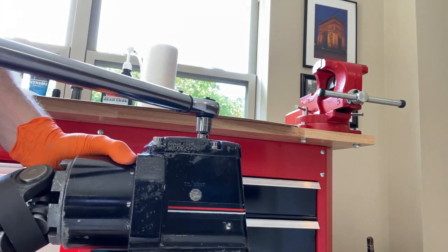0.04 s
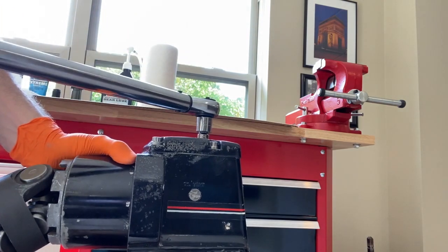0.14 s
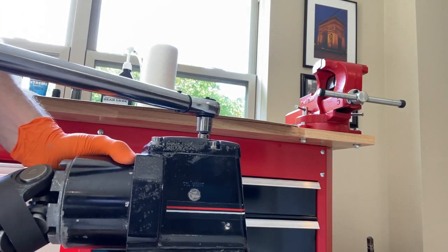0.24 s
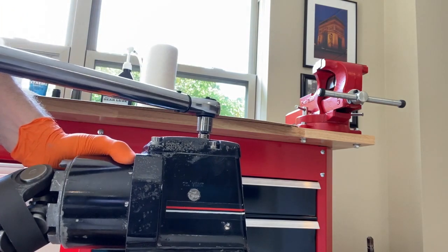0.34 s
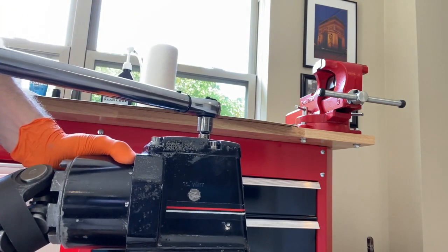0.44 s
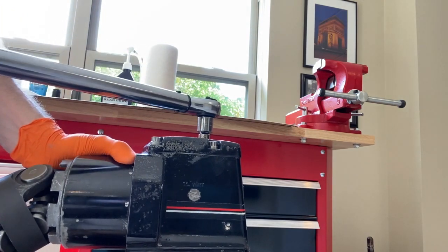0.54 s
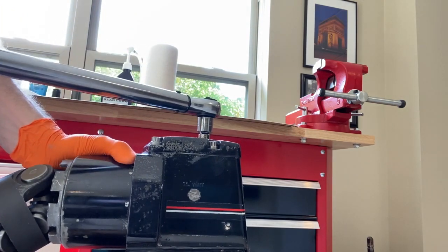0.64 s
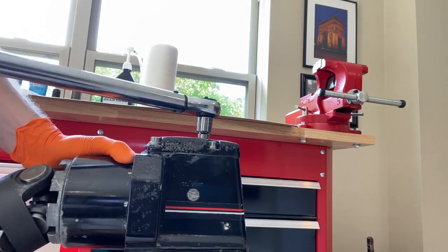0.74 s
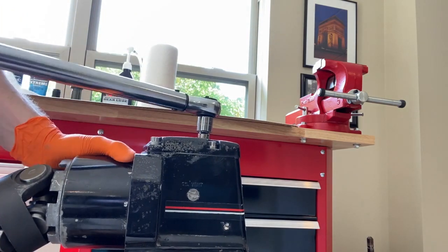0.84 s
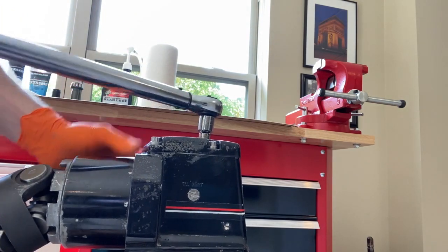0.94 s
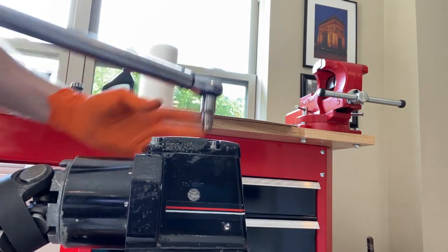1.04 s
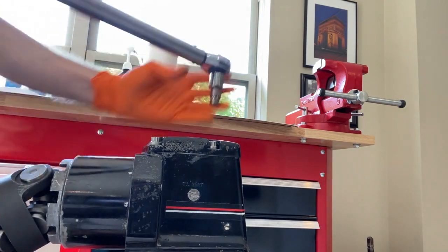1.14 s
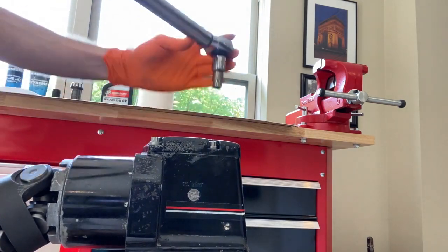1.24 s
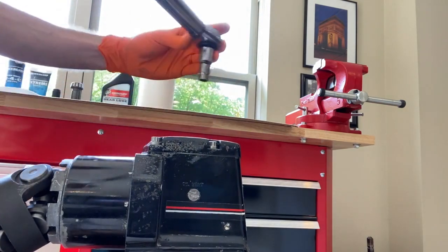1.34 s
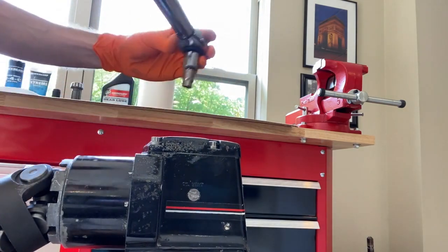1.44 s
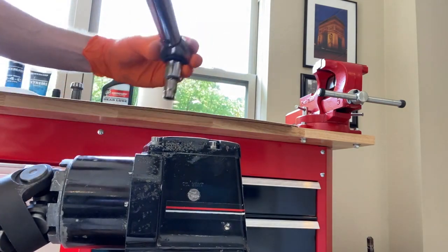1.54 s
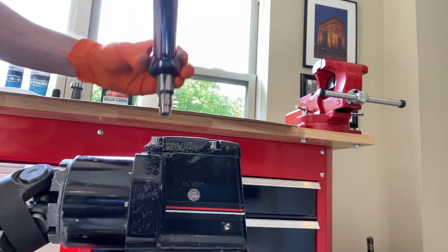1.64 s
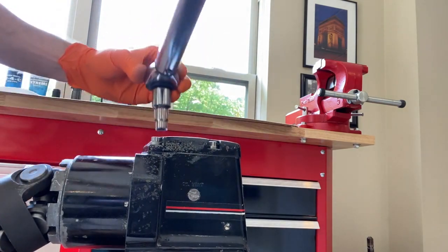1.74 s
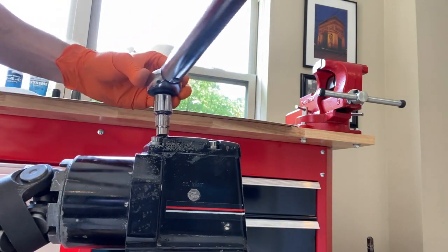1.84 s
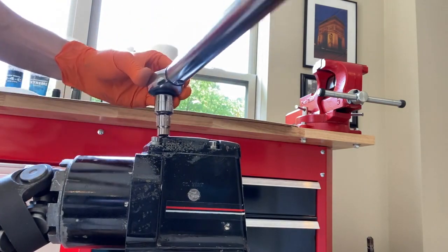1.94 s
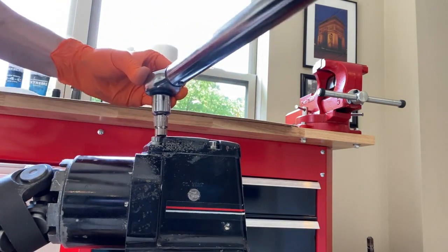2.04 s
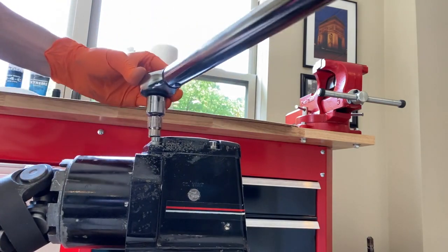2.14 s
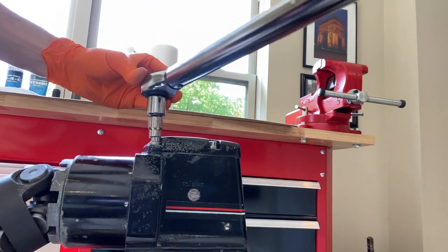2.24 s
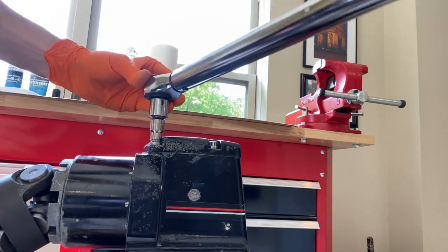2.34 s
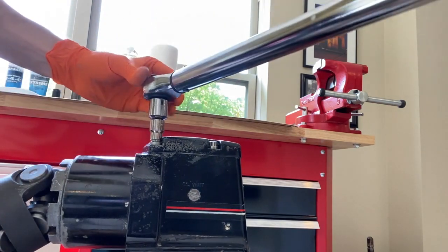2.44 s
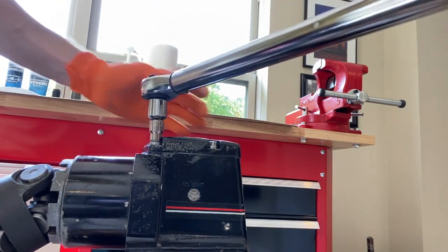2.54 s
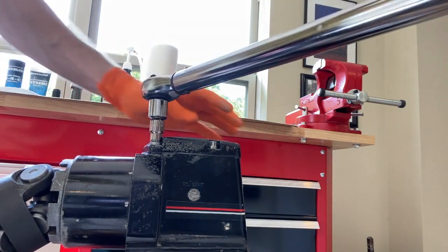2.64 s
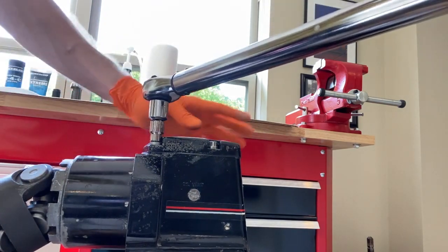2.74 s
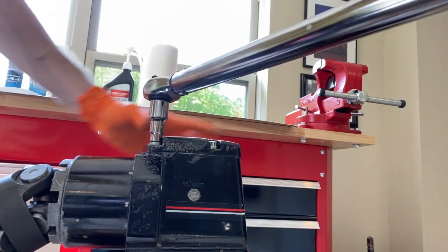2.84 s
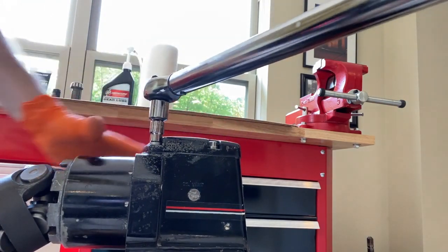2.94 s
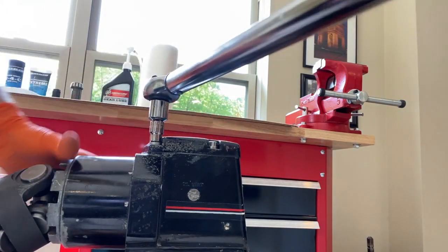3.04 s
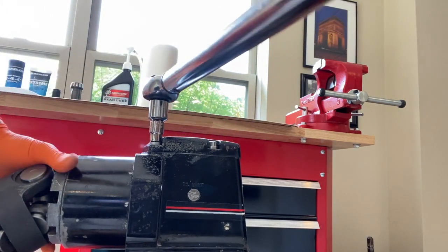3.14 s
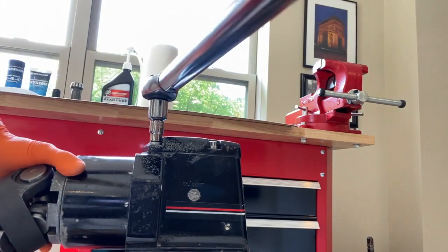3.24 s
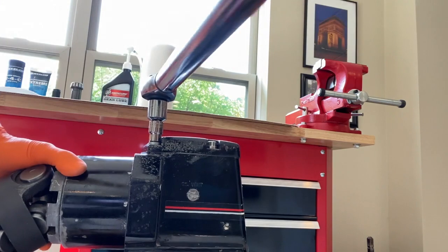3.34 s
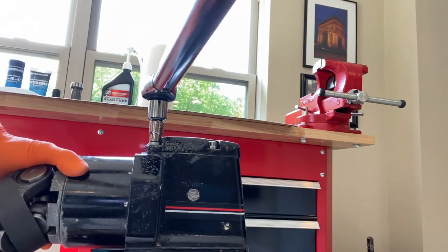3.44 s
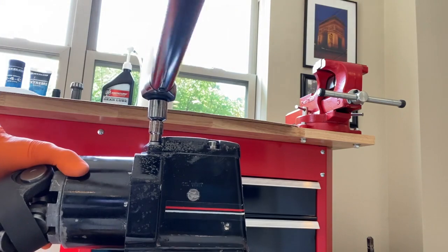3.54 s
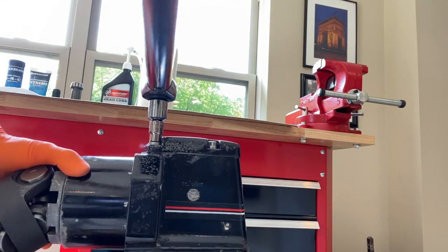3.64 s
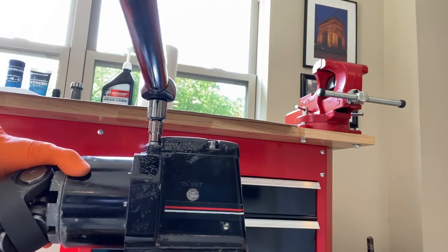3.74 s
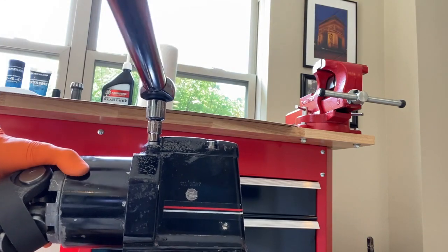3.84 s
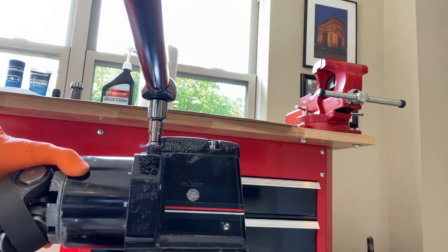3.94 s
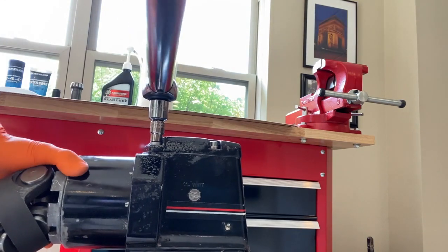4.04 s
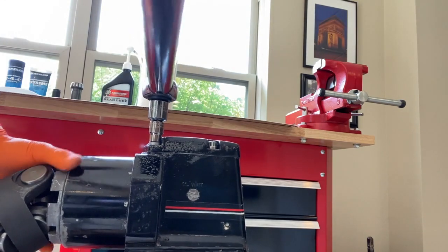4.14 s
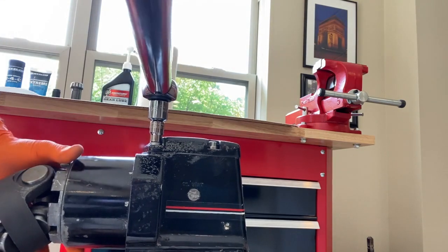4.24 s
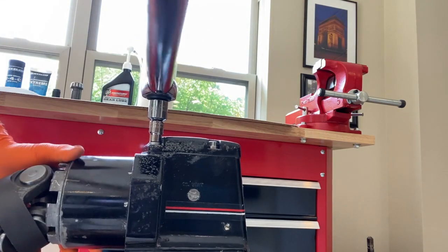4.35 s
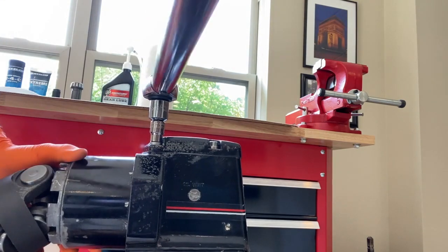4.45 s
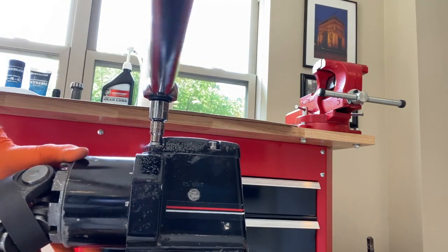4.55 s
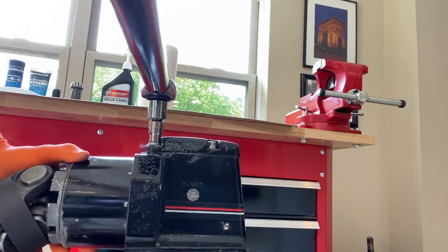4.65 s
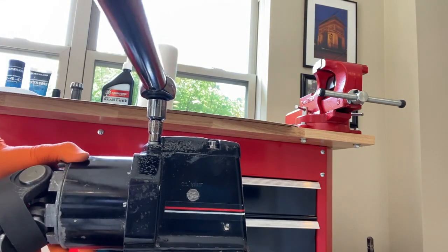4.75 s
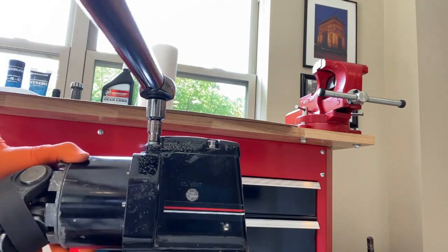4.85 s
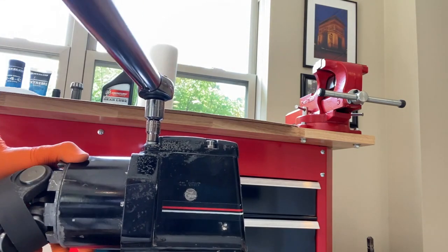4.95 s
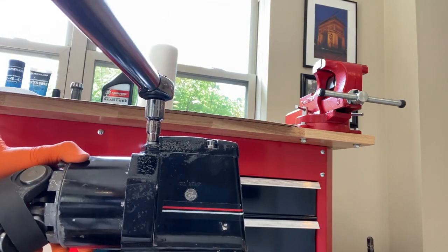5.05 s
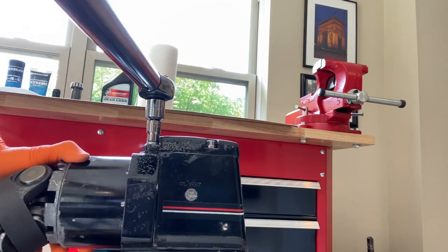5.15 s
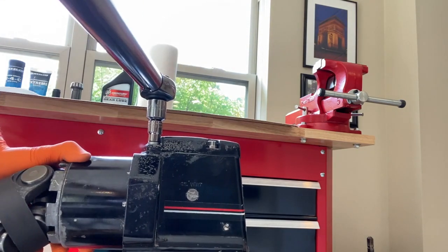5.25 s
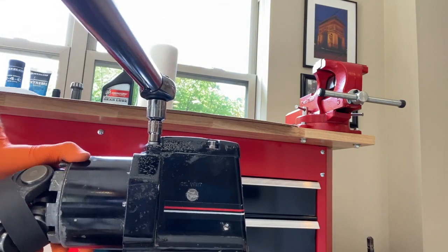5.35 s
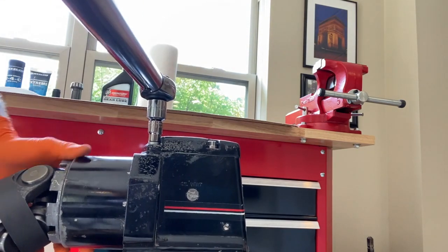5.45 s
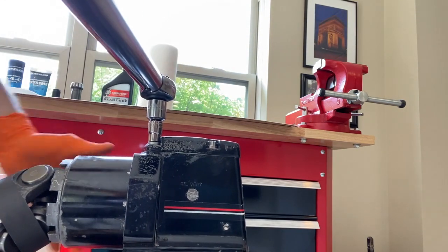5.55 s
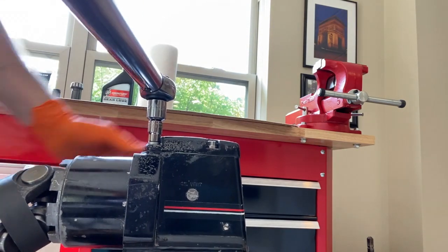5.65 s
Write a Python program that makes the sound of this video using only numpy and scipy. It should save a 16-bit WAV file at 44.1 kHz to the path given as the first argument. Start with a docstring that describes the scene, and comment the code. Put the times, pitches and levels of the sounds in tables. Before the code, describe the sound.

Irregular metallic clicks, socket knocks and ratchet ticks from a torque wrench on a heavy casting, with rubber glove scuffs in a quiet garage.

```python
"""A low hum and soft air fill a quiet garage; then a steel torque wrench is worked on a cast housing, close by.
The hum is noise plus one sine that swell together; faint high chirps outside the window are short sines.
A rubber glove slides on the casting: shaped hiss and scuff. The wrench clicks over, its socket knocks on
bolt heads and the ratchet ticks: each contact is a tick and rattle of noise over ringing steel modes.
Wrench and glove get a left-right lead and balance that follow the work; the garage adds reflections."""
import sys
import numpy as np
from scipy import signal
from scipy.fft import rfft, irfft
from scipy.io import wavfile
from scipy.ndimage import uniform_filter1d

SR = 44100
rng = np.random.default_rng(int(sys.argv[2]) if len(sys.argv) > 2 else 0)


def wav_out(sig):
    """Save sig, one row per channel (or a flat mono array), as 16-bit PCM at SR to the path in sys.argv[1]."""
    wavfile.write(sys.argv[1], SR, np.round(np.clip(np.atleast_2d(sig).T, -1, 1) * 32767).astype(np.int16))


N = 251308  # samples

# Room air colour: (frequency [Hz], relative density [dB per Hz])
AIR_SPECTRUM = [(50, -55), (90, 1.5), (146, -14), (175, -9.5), (350, -15), (600, -20.5), (1600, -27.5),
                (5200, -36), (8200, -35), (13000, -40.5), (13700, -64)]
AIR_DB = -61
# Hum noise colour: (frequency [Hz], relative density [dB per Hz])
HUM_SPECTRUM = [(22, -36), (40, -18), (52, 5.5), (59, 51.5), (66, 15.5), (85, -5), (120, -36), (170, -24)]
# Swelling of the hum, before its trim: (time [s], level [dB])
HUM_SWELL = [(0.0, -58), (0.7, -54), (1.19, -59.5), (1.59, -49), (1.97, -54.5), (2.6, -54), (2.9, -50.5),
             (3.4, -54), (4.63, -49), (4.92, -54.5), (5.52, -48.5), (5.7, -56)]
HUM_TRIM_DB, HUM_TONE_HZ, HUM_TONE_DB = -7.0, 59.4, -5.5  # the tone level rides on the swell
# Likeness of the channels in room air and reflections: (frequency [Hz], left-right likeness [-1 to 1, clipped])
ROOM_LIKENESS = [(60, 0.75), (150, 0.44), (370, 0.42), (920, -0.32), (2290, 0.015), (5700, 0.072),
                 (8400, 1), (10500, 0.72), (14200, -1.1)]

# Whistles outside: (time [s], level [dB], frequency [Hz], length [s])
CHIRPS = [(0.404, -69, 8230, 0.021), (0.424, -68.5, 8200, 0.0084), (0.77, -65, 8200, 0.018),
          (0.787, -60.5, 8230, 0.044), (2.777, -59.5, 8320, 0.046)]

# Decay of the reflections: (frequency [Hz], t60 [s])
GARAGE_T60 = [(200, 0.34), (1000, 0.15), (3000, 0.28), (8000, 0.21), (14000, 0.14)]
GARAGE_DB = -11
# Where the work is heard: (time [s], lead of the left channel [microseconds], left-right balance [dB])
PLACE = [(.5, 116, 3), (.9, 7.6, 0.4), (2.8, 7.3, -0.9), (3.1, 5.2, 1), (3.9, 2.2, 0.5), (4.1, 109, 0.5),
         (4.35, 18, -2), (4.8, 6.6, 1), (5.2, 106, 1.5), (5.6, 107, 2.5)]
# Frequency-dependent phase lead of the left channel: (frequency [Hz], lead [radians])
PHASE_LEAD = [(5000, 0.45), (9500, 0.023), (11500, 0.8), (14300, 1.5)]
DELAY_S = .0021866  # fixed delay on all wrench and glove sounds

# Fine hiss of rubber on metal: (frequency [Hz], relative density [dB per Hz])
HISS_SPECTRUM = [(900, -20), (1500, -16.5), (2400, -9), (3100, -18), (4200, -13.5), (8300, -12.5),
                 (13300, -19.5), (14000, -55)]
# Duller scuff: (frequency [Hz], relative density [dB per Hz])
SCUFF_SPECTRUM = [(70, -2.5), (120, 5), (240, -14), (370, -3), (650, -8.5), (1200, -10), (2200, -19.5),
                  (4000, -21), (7000, -61)]
# Likeness of the channels in the sliding noise: (frequency [Hz], left-right likeness [-1 to 1])
SLIDE_LIKENESS = [(100, 0.25), (4000, 0.043), (8500, 0.99), (14000, 0.7)]
# Strokes of glove and socket, before the fixed delay:
# (time of full pressure [s], rise [s], hold [s], release [s], hiss level [dB], scuff level [dB])
STROKES = [(0.896, 0.13, 0.017, 0.14, -63, -63), (1.113, 0.095, 0.016, 0.093, -72, -97),
           (1.315, 0.42, .02, 0.18, -68, -79), (1.49, 0.21, 0.071, 0.18, -80, -65.5),
           (2.042, 0.1, 0.082, 0.13, -92, -68.5), (2.443, 0.1, 0.0076, 0.087, -54, -83),
           (2.533, 0.083, 0.049, 0.38, -70.5, -92), (2.988, 0.059, 0.04, .1, -65, -83.5),
           (3.089, 0.04, 0.0066, 0.021, -37.5, -50), (3.147, 0.04, 0.017, 0.17, -64.5, -62.5),
           (3.934, 0.059, 0.0038, 0.074, -62, -44.5), (4.079, 0.058, 0.023, 0.12, -51.5, -55),
           (4.159, 0.19, 0.16, 0.034, -61, -53.5), (4.393, 0.066, 0.18, 0.04, -106, -55.5),
           (4.566, 0.12, 0.009, 0.059, -61, -53.5), (4.743, 0.065, 0.0062, 0.058, -64.5, -41.5),
           (5.3, 0.13, 0.048, 0.088, -63.5, -47), (5.391, 0.15, 0.096, 0.035, -57.5, -56.5),
           (5.55, 0.14, 0.14, 0.11, -68.5, -57), (5.612, 0.092, 0.0058, 0.045, -74, -86)]
STROKE_SPAN_DB = 30  # covered by each rise and each release

# Modes of wrench, socket and casting bolted together, before detuning and each contact's ring factor:
# (frequency [Hz], relative level [dB], t60 [s])
STEEL_MODES = [(220.2, 1, 0.087), (264.7, -14, 0.13), (309, 2.5, 0.075), (346, 3, 0.084),
               (443.7, -16, 0.36), (578, 1.5, 0.068), (679, 11, 0.031), (785, -0.5, 0.076),
               (948.4, 0.5, 0.11), (980.6, -0.5, 0.15), (1052, -12.5, 0.25), (1428, -13.5, 0.41),
               (1498, 1.5, 0.072), (1541, -1, 0.095), (1950, -1.5, 0.15), (2123, -19.5, 0.19),
               (2290, -13.5, 0.19), (2550, -4, 0.038), (2945, -5, 0.099), (3254, -21, 0.13),
               (4140, -9, .06), (4620, 3, 0.06), (5580, -11, 0.047), (5600, -16, 0.029), (5870, 3, 0.045),
               (7350, 8, 0.013), (7570, 9, 0.024), (7900, 7.5, 0.056), (8100, -16, 0.034),
               (10680, -22, 0.021)]
# How well every contact couples into the parts: (frequency [Hz], gain [dB])
COUPLING = [(210, 1.5), (420, 4.5), (950, -2), (1700, 1.2), (4000, -0.5), (9000, -2), (14000, -1)]
# Blows of steel on steel, before the fixed delay: (time [s], level at the spot struck [dB],
# favoured frequency [Hz], fall below it [dB per octave], fall above it [dB per octave],
# contact time [ms], ring length [factor])
BLOWS = [(.4515, -31, 7260, 0.5, 22, .02, 0.096), (0.4516, -24, 945, 10.5, -1.5, 0.18, 0.65),
         (0.46, -37.5, 206.6, 6, 5.5, 0.41, 1.4), (0.893, -50, 300, -6, 4, 0.044, 0.33),
         (1.089, -68.5, 816, 4, -3.5, .03, 0.65), (1.127, -58, 2800, 17, 12, 0.05, 2.1),
         (1.255, -51.5, 2870, 13, 6, 0.088, 0.78), (1.343, -46, 1820, 5, 6, 0.12, 0.36),
         (1.441, -53.5, 1660, 0, 6, 0.26, 0.52), (.585, -57, 6260, 3, 15, .03, .4),
         (1.798, -35.5, 1490, 1, -6.5, 0.25, 0.79), (1.8082, -38, 2270, 1.5, 2, .03, 1.12),
         (1.936, -58.5, 2170, 10, 2, .03, 0.44), (2.141, -30.5, 1530, 4, -2, 0.033, 0.54),
         (2.248, -35.5, 1570, 2, -3, 0.026, 0.75), (2.2606, -32, 456, 22, 4.5, 0.06, 0.69),
         (2.327, -48.5, 1500, -1, 6.5, .03, 0.66), (2.434, -37.5, 2520, 8.5, 20.5, 0.09, 0.071),
         (2.468, -63, 2230, 7, -3, .03, 1.1), (2.545, -67.5, 462, 10, -3.5, 0.1, 0.64),
         (2.731, -42.5, 790, -6.5, 1, 0.027, 0.67), (2.847, -55, 2740, 16, 11, .2, 0.5),
         (2.964, -71.5, 358, -34, -2.5, 0.034, 0.93), (3.2138, -41.5, 434, -11, 8, 0.45, 0.058),
         (3.213, -52, 1540, 10, 19, 0.22, 0.27), (3.507, -58.5, 297, -16, -0.1, 0.28, 0.75),
         (3.926, -39.5, 3760, 1, 4, 0.051, 0.4), (4.287, -41.5, 510, -4, 0.5, 0.31, 0.37),
         (4.333, -43.5, 1520, -5, 8, 0.033, 0.59), (4.393, -49, 1010, 0, 3.5, 0.17, 1.4),
         (4.469, -46, 483, -14, 1, 0.21, 0.77), (4.533, -41.5, 302, -11, 2.5, 0.035, 0.24),
         (4.565, -38, 572, -16, -1, 0.097, 0.21), (4.605, -32, 218, 0, 9, 1.2, .1),
         (4.63, -36, 214, 0, 14, 1.5, .1), (3.933, -44, 215, 3, 3, 1.1, 0.32),
         (4.691, -60, 702, 24, 0, .03, 0.68), (4.781, -37.5, 434, -7.5, 6, 0.56, 1.47),
         (4.783, -59, 10000, 9, -4, 0.011, 1.8), (4.821, -32.5, 386, 9, 2.5, 1.55, 0.43),
         (5.015, -57.5, 444, 29, 1.5, 0.046, 0.43), (5.267, -40.5, 369, 7, 6, .1, 0.96),
         (5.286, -40, 490, 45, 6, 0.15, 0.53), (5.386, -50, 8000, 4, -2, .02, 0.082),
         (5.428, -56.5, 360, -9, -2.5, 0.038, 0.93), (5.536, -35, 490, -2, 22, 0.18, 0.36),
         (5.554, -45.5, 416, -2, 3.4, 0.082, 0.82), (5.61, -48.5, 335, 14, 15, 0.081, 1.4)]
BLOW_BUILD_MS = 0.19
# Contacts with a softer onset, swelling over about 0.5 to 8 ms, before the fixed delay:
# (time [s], level [dB], favoured frequency [Hz], fall below it [dB per octave],
# fall above it [dB per octave], contact time [ms], ring length [factor], build-up [ms])
SOFT_ONSETS = [(.438, -26, 2560, 15, 18, .1, 1.4, 4.6), (.948, -42.5, 1500, -1, 15, .08, 0.51, 4.2),
               (.958, -41.5, 3500, 15, 8, .05, 0.62, 4), (.96, -42.5, 970, 4, -0.5, 0.13, 0.56, 3.8),
               (1.301, -51, 2500, 10, 11, 0.1, 1.15, 3.3), (2.238, -38, 4220, -4, 7, .05, 0.49, 3),
               (2.272, -40, 890, -1, 6, .05, 0.75, 4.6), (2.282, -30.5, 954, -1.5, 0, .04, 0.49, 2.7),
               (2.291, -31, 2150, -6, -2.5, 0.057, 0.23, 2.8), (3.043, -38, 1210, 5, 18, .05, 0.46, 1.2),
               (3.06, -44.5, 2050, 7, 18, .05, 0.87, 3.3), (3.08, -32.5, 1190, 10, 9, .05, 0.71, 3.7),
               (4.054, -42.5, 1140, 16, 4, .05, 3, 8.2), (4.731, -31, 1400, -3, 2.5, 0.54, 1.18, 3.8),
               (4.736, -16, 328, 6.5, 6, 0.96, 0.63, 1.45), (4.738, -20.5, 676, 17, 11, 0.43, .4, 0.55),
               (4.75, -43, 1920, 16, 23, 0.47, 0.71, 2.1)]
FAVOUR_DB, FAVOUR_OCTAVES = 10.5, .2  # full lift at the favoured frequency, and its width
RING_DB, RING_PER_DB = -11.5, 0.25  # ring trim for a -34 dB blow; extra ring per dB above that, less below
TICK_DB, TICK_T60 = 15, .006  # t60 in s
RATTLE_DB, RATTLE_T60 = 2, 0.087  # before softness and ring factor; t60 in s
SOFT_DB_PER_MS = 8  # soft contacts rattle less
# Hard contacts shake loose joints, which smear the modes mostly above this pitch
LOOSE_HZ, LOOSE_SHARE, SOFT_MS = 1100, .96, .3


def gain_of(db):
    """Decibels to amplitude."""
    return 10 ** (np.asarray(db) / 20)


def evened(x):
    """Scales to rms 1."""
    return x / np.sqrt(np.mean(x ** 2) + 1e-20)


def read(points, hz):
    """Reads a table of values on a log-frequency axis."""
    f, value = np.transpose(points)
    return np.interp(np.log(hz + 1), np.log(f + 1), value)


def add(mix, s, sound):
    """Mixes a two-channel sound in at time s."""
    part = mix[:, round(s * SR):][:, :sound.shape[1]]
    part += sound[:, :part.shape[1]]


def noise(spectrum, likeness, patchy_db, size):
    """Two-channel noise of rms 1 from random short-time spectra with drifting patches."""
    frames, hz = N // (size // 4) + 5, np.fft.rfftfreq(size, 1 / SR)
    a, b, c, d, patches = rng.standard_normal((frames, len(hz), 5)).T
    patches = uniform_filter1d(patches, size=10, axis=0)  # across frequency
    patches = evened(uniform_filter1d(patches, size=8, axis=1))  # across time
    like = np.clip(read(likeness, hz), -1, 1)[:, None]
    left = a + 1j * b
    right = like * left + np.sqrt(1 - like ** 2) * (c + 1j * d)
    z = np.array([left, right]) * gain_of(read(spectrum, hz)[:, None] + patchy_db * patches)
    return evened(signal.istft(z, nperseg=size, noverlap=size - size // 4)[1][:, :N])


def room_air():
    """Broad air noise at one level, under a lumpy hum of narrow noise and a sine that swell together."""
    air = gain_of(AIR_DB) * noise(AIR_SPECTRUM, ROOM_LIKENESS, patchy_db=1.6, size=1024)
    t = np.arange(N) / SR
    s, db = np.transpose(HUM_SWELL)
    swell = gain_of(np.interp(t, s, db) + HUM_TRIM_DB)
    lumpy = noise(HUM_SPECTRUM, ROOM_LIKENESS, patchy_db=3.0, size=4096)
    tone = gain_of(HUM_TONE_DB) * np.sin(2 * np.pi * HUM_TONE_HZ * t)
    return air + swell * (lumpy + tone)


def garage(x):
    """Sparse reflections of random sign, each band dying at its own speed."""
    taps = np.zeros((3, SR // 2))
    jitter = rng.integers(0, 20, (3, (SR // 2 - 151) // 20))
    at = np.arange(150, SR // 2 - 20, 20) + jitter  # one reflection in every 20 samples
    np.put_along_axis(taps, at, rng.choice([-1., 1.], at.shape), 1)
    hz, t, z = signal.stft(taps, SR, nperseg=256)
    like = np.clip(read(ROOM_LIKENESS, hz), 0, 1)[:, None]
    z = np.sqrt(like) * z[0] + np.sqrt(1 - like) * z[1:]  # shared part and each channel's own
    decay = gain_of(-60 * t / read(GARAGE_T60, hz)[:, None])
    tail = signal.istft(z * decay, SR, nperseg=256)[1]
    return signal.fftconvolve(x, tail / np.linalg.norm(tail[0]), axes=1)[:, :N]


def placed(x, s):
    """Spreads a sound over two channels: a fixed delay, the left channel's lead and the balance at time s."""
    at, lead_us, pan_db = np.transpose(PLACE)
    half = np.array([[.5], [-.5]])  # left and right share each difference
    f = np.fft.rfftfreq(x.shape[-1], 1 / SR)
    advance_s = half * np.interp(s, at, lead_us) / 1e6 - DELAY_S
    turn = 2 * np.pi * f * advance_s + half * read(PHASE_LEAD, f)
    return irfft(rfft(x) * np.exp(1j * turn), x.shape[-1]) * gain_of(half * np.interp(s, at, pan_db))


def chirps():
    """Faint high whistles from outside: steady sines that open quickly and close more gently."""
    mix = np.zeros((2, N))
    for s, db, hz, length in CHIRPS:
        t = np.arange(0, length, 1 / SR)
        envelope = np.sin(np.pi * (t / length) ** 0.28)
        add(mix, s, np.ones((2, 1)) * gain_of(db) * np.sin(2 * np.pi * hz * t) * envelope)
    return mix


def slides():
    """Rubber on metal: a fine hiss and a duller scuff, both roughened by tiny slips."""
    fast = evened(uniform_filter1d(rng.standard_normal(N), size=200))
    slow = evened(uniform_filter1d(rng.standard_normal(N), size=1200))
    slips = gain_of(1.25 * fast + 0.39 * slow)
    hiss = slips * noise(HISS_SPECTRUM, SLIDE_LIKENESS, patchy_db=2.0, size=256)
    scuff = slips * noise(SCUFF_SPECTRUM, SLIDE_LIKENESS, patchy_db=4.0, size=512)
    mix = np.zeros((2, N))
    for s, rise, hold, release, hiss_db, scuff_db in STROKES:
        corners = s + np.cumsum([-rise, rise, hold, release])
        at = np.arange(round(corners[0] * SR), min(round(corners[-1] * SR), N))
        pressure = gain_of(STROKE_SPAN_DB * np.interp(at / SR, corners, [-1, 0, 0, -1]))
        stroke = pressure * (gain_of(hiss_db) * hiss[:, at] + gain_of(scuff_db) * scuff[:, at])
        add(mix, corners[0], placed(stroke, s))
    return mix


def causal_colour(gain):
    """Minimum-phase spectrum of a gain curve: folding its cepstrum makes the colour causal."""
    cepstrum = irfft(np.log(gain))
    middle = len(cepstrum) // 2
    cepstrum[1:middle] *= 2
    cepstrum[middle + 1:] = 0
    return np.exp(rfft(cepstrum))


def steel_ring(t, reach_db, contact_ms, length, build, chance):
    """Decaying steel modes in close pairs that beat, smeared when a hard contact shakes loose joints."""
    hz, mode_db, t60 = np.transpose(STEEL_MODES + STEEL_MODES)[:, :, None]
    count = len(hz)
    detune, spread_db = chance[:2 * count].reshape(2, -1, 1)
    hz = hz * (1 + .007 * detune)  # grip and load shift the modes a little
    rise = 1 - np.exp(-t * hz / 6.1)  # a mode builds over about six cycles
    ring = gain_of(reach_db(hz) + mode_db + 2 * spread_db - 60 * t / (t60 * length))
    steps = chance[2 * count:][:count * 80].reshape(-1, 80)
    wander = signal.resample(steps, len(t), axis=1)
    loose = LOOSE_SHARE * np.clip(2 * np.log2(hz / LOOSE_HZ), .15, 1)
    loose = loose / (1 + (contact_ms / SOFT_MS) ** 4) * np.minimum(t / .005, 1)
    ring = ring * build * (np.sqrt(1 - loose ** 2) + loose * wander)
    fade = np.cos(np.pi / 2 * t / t[-1])
    return (rise * ring * np.sin(2 * np.pi * hz * t)).sum(0) * fade


def contact_noise(t, contact_ms, length, build, chance):
    """A sharp tick and a longer rattle: random-sign impulses under two decays."""
    t = t[:2048]
    bumps = np.interp(t, np.linspace(0, t[-1], num=24), chance[-2072:-2048])
    knocks_db = 6 * np.minimum(t / .006, 1) * bumps  # loose parts touch again unevenly
    tick = gain_of(TICK_DB - 60 * t / TICK_T60)
    rattle_db = RATTLE_DB - SOFT_DB_PER_MS * contact_ms + knocks_db
    rattle = gain_of(rattle_db - 60 * t / (RATTLE_T60 * length))
    return np.sign(chance[-2048:]) * build[:len(t)] * (tick + rattle)


def blow(db, favoured_hz, below_db, above_db, contact_ms, length, build_ms, chance):
    """One contact: coloured tick and rattle, and the modes ringing as strongly as the blow reaches them."""
    t = np.arange(9216) / SR
    length = np.clip(length, .05, 3)
    build = (1 - np.exp(-1000 * (t + 1 / SR) / max(build_ms, 1e-3))) ** 2

    def reach_db(hz):
        """Drive at a frequency: falls away from the favoured spot, which is lifted more by firm blows."""
        octaves = np.log2(np.clip(hz, COUPLING[0][0], COUPLING[-1][0]) / favoured_hz)
        fall_db = np.where(octaves < 0, -below_db, above_db) * octaves
        # a long contact cannot drive the treble
        fall_db = fall_db + 10 * np.log10(1 + (hz * contact_ms / 1000) ** 4)
        lift_db = FAVOUR_DB * np.clip((db + 85) / 45, .3, 1) * np.exp(-(octaves / FAVOUR_OCTAVES) ** 2)
        return db + read(COUPLING, hz) - fall_db + lift_db

    ring = steel_ring(t, reach_db, contact_ms, length, build, chance)
    ring = gain_of(RING_DB + RING_PER_DB * (db + 34)) * ring
    contact = contact_noise(t, contact_ms, length, build, chance)
    f = np.fft.rfftfreq(len(t), 1 / SR)
    tilt = np.sqrt(4000 / (f + 200)) * (f + 5) / (f + 600)  # thins the bass and eases the treble
    colour = causal_colour(gain_of(reach_db(f)) * tilt)
    return ring + irfft(rfft(contact, len(t)) * colour)


def wrench():
    """All sharp blows and softer-onset contacts of wrench, socket and ratchet."""
    mix = np.zeros((2, N))
    rows = [row + (BLOW_BUILD_MS,) for row in BLOWS] + SOFT_ONSETS
    for (s, *row), chance in zip(rows, rng.standard_normal((len(rows), 7000))):
        add(mix, s, placed(blow(*row, chance), s))
    return mix


def scene():
    """Wrench, glove and chirps, their reflections and the room."""
    sources = wrench() + slides() + chirps()
    return sources + gain_of(GARAGE_DB) * garage(sources) + room_air()


def record(dry):
    """A steep linear-phase low-pass at 14400 Hz closes the top of the band."""
    low_pass = signal.firwin(255, 14400, window=("kaiser", 7), fs=SR)
    return signal.oaconvolve(dry, low_pass[None], "same")


dry = scene()
out = record(dry)
wav_out(out)
```